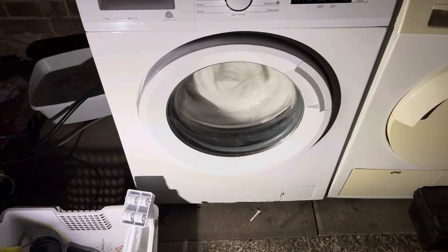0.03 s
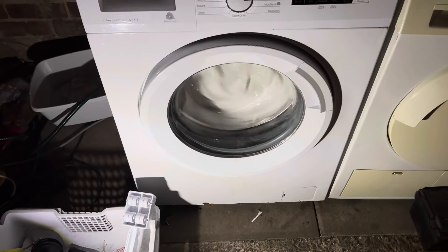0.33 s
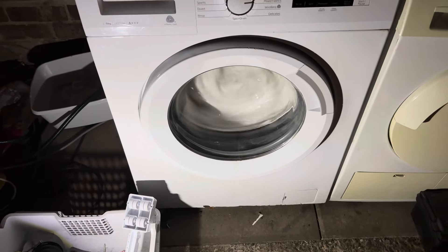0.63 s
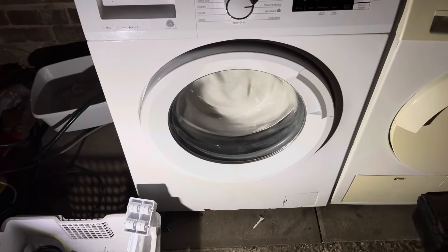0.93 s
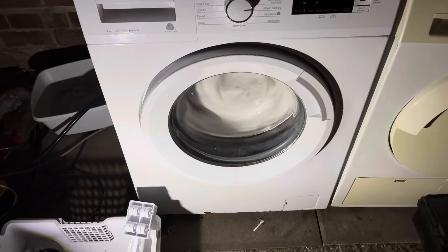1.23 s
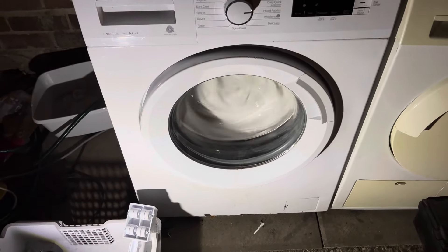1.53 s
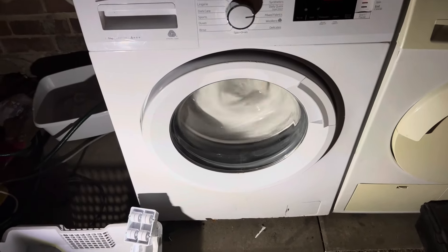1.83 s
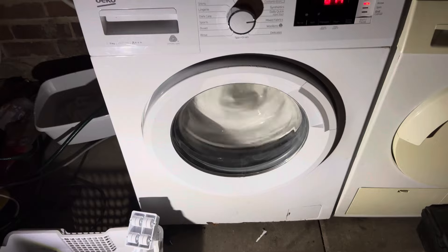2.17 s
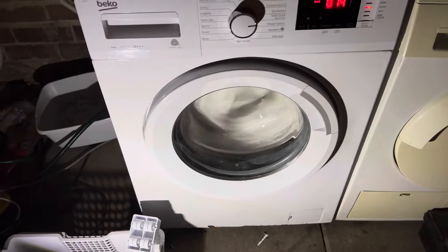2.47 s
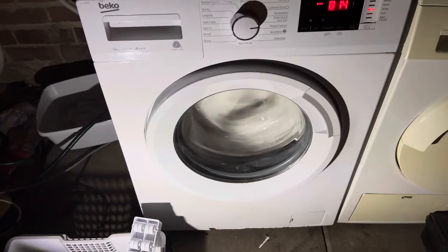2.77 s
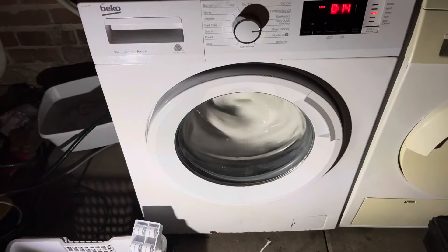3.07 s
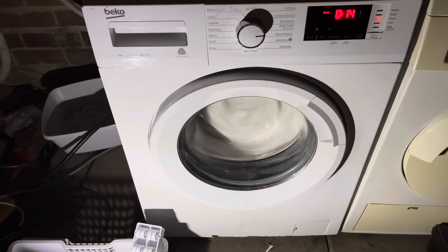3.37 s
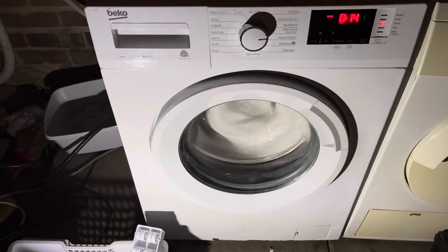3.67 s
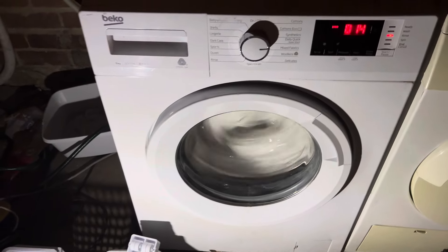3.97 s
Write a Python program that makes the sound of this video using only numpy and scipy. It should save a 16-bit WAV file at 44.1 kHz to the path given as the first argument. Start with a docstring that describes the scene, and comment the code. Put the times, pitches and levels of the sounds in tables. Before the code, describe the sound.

A washing machine spins up, its wet, lopsided load thumping rhythmically over a low rumble.

```python
"""A front-loading washing machine gathers speed for its spin in a small room, about 3.5 turns a second.
On each turn the wet, lopsided load scrubs the door seal by stick-slip friction, then strikes the tub
and excites the cabinet's modes. Beneath this the drum rumbles on its springs and the motor hums.
Water sprays, ticks on the glass and sloshes, air pockets gulp, lumps knock and loose pieces rattle;
later, cloth rustles on the glass and the seal squeaks."""
import sys
import numpy as np
from scipy import signal
from scipy.fft import rfft, irfft
from scipy.io import wavfile
from scipy.ndimage import uniform_filter1d

SR = 44100
rng = np.random.default_rng(int(sys.argv[2]) if len(sys.argv) > 2 else 0)


def wav_out(sig):
    """Save sig, one row per channel (or a flat mono array), as 16-bit PCM at SR to the path in sys.argv[1]."""
    wavfile.write(sys.argv[1], SR, np.round(np.clip(np.atleast_2d(sig).T, -1, 1) * 32767).astype(np.int16))


N = 176400


def from_db(db):
    """Amplitude ratio of a level in decibels."""
    return 10 ** (np.asarray(db) / 20)


def rms_one(x):
    """Normalisation to unit rms."""
    return x / np.sqrt(np.mean(x ** 2) + 1e-20)


def level(rows):
    """Gain over time, interpolated in decibels between (seconds, dB) points."""
    return from_db(np.interp(np.arange(N) / SR, *np.transpose(rows)))


def at_hz(points, hz, column=1):
    """Interpolation of a table column on a logarithmic frequency axis."""
    table = np.array(points)
    return np.interp(np.log(hz), np.log(table[:, 0]), table[:, column])


def swell(start, attack_s, hold_s, release_s):
    """Envelope: exponential growth up to the start, a hold, then exponential decay."""
    t = np.arange(N) / SR - start
    exponent = np.minimum(t, 0) / attack_s - np.maximum(t - hold_s, 0) / release_s
    return np.exp(np.maximum(exponent, -40))


def band(x, low_hz, high_hz):
    """Butterworth band-pass filtering."""
    sos = signal.butter(2, [low_hz, min(high_hz, .45 * SR)], "band", fs=SR, output="sos")
    return signal.sosfilt(sos, x + 1e-18)


def grains(per_s, spread_db):
    """Shot noise: randomly timed impulses of either sign; rms 1."""
    sizes = from_db(spread_db * np.minimum(rng.exponential(1, N), 4)) * rng.choice([-1, 1], N)
    return rms_one(sizes * (rng.random(N) < per_s / SR))


def ring(force, modes):
    """Modal superposition: a force drives damped (Hz, dB, T60) resonators of alternating sign."""
    out = 0
    for k, (hz, db, t60) in enumerate(modes):
        radius, angle = from_db(-60 / (t60 * SR)), 2 * np.pi * hz / SR
        feedback = [1, -2 * radius * np.cos(angle), radius * radius]
        mode = signal.lfilter([0, np.sin(angle)], feedback, force + 1e-18)
        out = out + (-1) ** k * from_db(db) * mode
    return out


def wavering(hz, width_hz):
    """Phase diffusion: a random walk in phase broadens a tone's spectral line; rms 1."""
    wander = np.cumsum(rng.standard_normal(N)) * np.sqrt(2 * np.pi * width_hz / SR)
    return rms_one(np.sin(2 * np.pi * hz * np.arange(N) / SR + wander))


def evened(x, window_s=.06):
    """Division by the running rms steadies a vibration but keeps its fast flutter."""
    power = uniform_filter1d(x ** 2, int(window_s * SR))
    return x / np.sqrt(np.maximum(power, 1e-12))


def panned(db):
    """Left and right gains for a level difference, left minus right."""
    return from_db(np.array([[db], [-db]]) / 2)


# Stereo image, in antiphase near 10 kHz. Each row: frequency in Hz, left-right correlation
# (limited to between -1 and 1 in use), left minus right level in dB.
STEREO_IMAGE = [(60, 0.18, 12), (160, 0.86, 3.5), (326, 0.91, -2.5), (700, 0.54, 1.5), (1280, 0.17, 2.5),
                (2760, 0.47, 5), (5200, 0.6, 1.5), (8150, 0.95, -1), (9440, -1.6, 7), (10730, -1.6, 0),
                (11290, 0.48, -0.5)]


def coloured(source, spectrum):
    """Spectral shaping in stereo: diffuse noise mixed with the source sets the correlation; rms 1."""
    hz = np.maximum(np.arange(N // 2 + 1) * SR / N, 1)
    correlation = np.clip(at_hz(STEREO_IMAGE, hz), -1, 1)
    mid = np.sqrt(1 + correlation) * rfft(source)
    side = np.sqrt(1 - correlation) * rfft(rng.standard_normal(N))
    lean = from_db(at_hz(STEREO_IMAGE, hz, column=2) / 2)
    channels = np.array([(mid + side) * lean, (mid - side) / lean])
    return rms_one(irfft(from_db(at_hz(spectrum, hz)) * channels, N))


def hollow(x, echo_db=-20):
    """Comb filtering: short reflections inside the drum interfere and ripple the spectrum."""
    out = x.copy()
    lags = (rng.uniform(.002, .022, 7) * SR).astype(int)
    for lag, sign in zip(lags, rng.choice([-1, 1], 7)):
        out[lag:] += sign * from_db(echo_db) * x[:-lag]
    return out


def room(x, t60_s=.28):
    """Reverberation: repeated reflection between brick walls, as eight feedback delays a side."""
    out = np.zeros((2, N))
    lags = (rng.uniform(.006, .035, 16) * SR).astype(int)
    for k, lag in enumerate(lags):
        loop, gain = x.copy(), from_db(-60 * lag / SR / t60_s)
        for i in range(lag, N, lag):
            loop[i:i + lag] += gain * loop[i - lag:i][:N - i]
        out[k % 2] += (loop - x) * (-1) ** (k // 2)
    return out / np.sqrt(8)


# Modes of the tub on its springs. Each row: frequency in Hz, relative gain in dB, T60 in seconds.
SUSPENSION_MODES = [(29, -13, 0.22), (40.3, -8.5, 0.14), (61.15, -5.5, 0.42), (70.8, 0, 0.18),
                    (87.5, 1.5, 0.15)]


def rumble():
    """Forced vibration: random shaking drives the resonances of the sprung tub; rms 1."""
    return rms_one(band(ring(rng.standard_normal(N), SUSPENSION_MODES), 15, 104))


# Spectrum of the rolling drum. Each row: frequency in Hz, relative spectral density in dB.
ROLL_SPECTRUM = [(30, -32), (60, -32), (120, 2.5), (200, 0.5), (340, -1.5), (460, -4.5), (800, -8),
                 (1500, -10.5), (2300, -15.5), (3300, -22.5), (5000, -36.5), (15000, -83)]
# Envelopes of the rumble and of the rolling. Each row: time in seconds, level in dB.
RUMBLE_ENVELOPE = [(0, -40.5), (.3, -36.5), (.9, -34), (1.1, -33.5), (2, -30.5), (2.7, -31.5), (3.3, -31),
                   (4, -34)]
ROLL_ENVELOPE = [(0, -39), (.6, -38), (1.2, -36.5), (2.05, -33.5), (2.6, -32), (3.2, -31.5), (4, -31.5)]


def drum():
    """Rolling noise: dense impulses merge into a grainy rush above the rumble of the suspension."""
    roll = coloured(hollow(grains(per_s=4000, spread_db=1.5)), ROLL_SPECTRUM)
    return level(RUMBLE_ENVELOPE) * rumble() + level(ROLL_ENVELOPE) * roll


def motor(hum_hz=198.1, whine_hz=3290):
    """Narrow-band machine noise: a low hum, and a thin whine that grows with the rolling of the drum."""
    growth = rms_one(level(ROLL_ENVELOPE) ** .45)
    hiss = rms_one(ring(rng.standard_normal(N), [(whine_hz, 0, .011)]))
    whine = from_db(-62) * wavering(whine_hz, width_hz=18) + from_db(-60) * hiss
    hum = from_db(-45) * wavering(hum_hz, width_hz=2.54)
    return hum + growth * whine


# Spectrum of the spray. Each row: frequency in Hz, relative spectral density in dB.
SPRAY_SPECTRUM = [(30, -30), (1500, -6.5), (3200, 4.5), (4500, 3.5), (5800, -0.5), (7500, -0.5),
                  (14000, -6)]
# Envelope of the spray. Each row: time in seconds, level in dB.
SPRAY_ENVELOPE = [(0, -52.5), (1.2, -53.5), (1.75, -51.5), (1.95, -51), (2.08, -54), (2.42, -52.5),
                  (2.6, -48.5), (2.9, -48), (3.22, -51.5), (3.5, -48.5), (4, -47.5)]
# Drops striking the glass. Each row: time in seconds, level in dB.
DROP_HITS = [(0.223, -55), (0.266, -50), (1.28, -51), (1.622, -53), (1.81, -54), (1.904, -50), (1.937, -50),
             (2.62, -43.5), (2.838, -47), (2.908, -46), (3.09, -48), (3.686, -50), (3.986, -46)]


def spray(drop_hz=11400):
    """Droplet impact: fine spray on the glass sums to a hiss, while larger drops tick singly."""
    hiss = coloured(rng.standard_normal(N), SPRAY_SPECTRUM)
    hits = sum(from_db(db) * swell(start, .0003, 0, .0038) for start, db in DROP_HITS)
    drops = hits * rms_one(band(rng.standard_normal(N), drop_hz, drop_hz * 1.15))
    return level(SPRAY_ENVELOPE) * hiss + drops + from_db(-8) * room(drops)


# Modes of the tub and cabinet. Each row: frequency in Hz, relative gain in dB, T60 in seconds.
CABINET_MODES = [(61.5, -5.5, 0.32), (79.6, -3, 0.14), (126, -15, 0.098), (149, -12.5, 0.18),
                 (181.3, 1, 0.2), (201.7, -5, 0.25), (255, 5.5, 0.069), (268.6, 0.5, 0.164),
                 (298.3, -0.5, 0.13), (332.6, -1, 0.29), (369.4, -3, .17), (391.2, -1, 0.2),
                 (429, -10, 0.089)]
# Landings of the load's heavy side. Each row: start in seconds, length in seconds,
# relative impact level in dB, relative sway level in dB.
LANDINGS = [(.25, 0.027, -55, -32), (0.504, 0.012, -33, -33), (0.79, 0.061, -30.5, -35),
            (1.074, 0.045, -24.5, -26), (1.314, 0.093, -24.3, -30.5), (1.661, 0.021, -22, -25.5),
            (1.952, 0.02, -22, -24), (2.235, 0.055, -23.5, -30), (2.51, 0.065, -23.5, -24.5),
            (2.766, 0.11, -23, -25), (3.06, 0.021, -20.5, -33), (3.33, 0.076, -24.3, -26.5),
            (3.55, 0.014, -26, -28), (3.79, 0.03, -30.5, -26.5)]


def thumps(contact_hz=388, blow_db=-15, jolt_db=-3):
    """Rotating unbalance: a soft blow and a flurry of jolts ring the cabinet as the sprung tub sways."""
    blows, weight, sway = np.zeros(N), 0, 0
    for start, length, db, sway_db in LANDINGS:
        blows[int(start * SR)] = from_db(db + blow_db)
        weight += from_db(db) * swell(start, .017, length, .054)
        sway += from_db(sway_db) * swell(start, .017, length, .045)
    soft_contact = signal.butter(1, contact_hz, fs=SR)
    jolts = signal.lfilter(*soft_contact, grains(per_s=900, spread_db=3.5))
    shaking = from_db(jolt_db) * weight * evened(ring(jolts, CABINET_MODES))
    body = ring(signal.lfilter(*soft_contact, blows), CABINET_MODES) + shaking
    return body + from_db(-8.5) * room(band(body, 76, 2000)) + from_db(-5.5) * sway * rumble()


# Modes of a loose piece. Each row: multiple of its pitch, relative gain in dB, T60 in seconds.
PIECE_MODES = [(.78, -13, .04), (1, 0, .017), (1.32, -17, .02)]
# Clacks in the drum. Each row: start in seconds, scuff level in dB, ping level in dB, pitch in Hz.
CLACKS = [(0.304, -45, -45, 4380), (1.825, -39, -38, 4130), (1.938, -50, -39.5, 6250),
          (1.950, -43, -28, 3700), (2.846, -46, -44, 7400), (2.921, -52, -41, 7200),
          (3.048, -40, -39, 2770), (3.706, -43, -36, 3080), (3.917, -48, -44, 3300)]


def rattles(scuff_decay_s=.0071):
    """Hard impact: small pieces hit the steel drum with a scuff of noise and a ping of free vibration."""
    out, size = np.zeros(N + SR), SR // 10
    decay = np.exp(-np.arange(size) / SR / scuff_decay_s)
    for start, scuff_db, ping_db, hz in CLACKS:
        scuff = decay * rms_one(band(rng.standard_normal(size), hz / 1.5, hz * 1.2))
        modes = [(hz * ratio, db, t60) for ratio, db, t60 in PIECE_MODES]
        ping = ring(signal.unit_impulse(size), modes)
        onset = int(start * SR)
        out[onset:onset + size] += from_db(scuff_db) * scuff + from_db(ping_db) * ping
    return out[:N] + from_db(-5) * room(out[:N])


# Modes of the door and front panel. Each row: frequency in Hz, relative gain in dB, T60 in seconds.
DOOR_MODES = [(343.8, 3, 0.2), (395, -9, 0.21), (513.3, -5.5, 0.12), (590, -5.5, 0.11), (936, -2, 0.095),
              (981, 2.5, 0.053), (1036, 3, 0.051), (1127, 1, 0.048), (1506, -9, 0.055)]
# Spectrum of the friction. Each row: frequency in Hz, relative spectral density in dB.
SCRUB_SPECTRUM = [(30, -45), (120, 8), (340, 7.5), (480, 2.5), (750, 4), (1050, -3), (1400, -3), (2000, -5),
                  (3000, -18), (5000, -23.5), (7500, -25.5), (15000, -44)]
# Passes of the load over the seal, one a turn. Each row: start in seconds, length in seconds,
# rush level in dB, door ring level in dB.
SEAL_PASSES = [(0.377, 0.15, -40, -53), (0.698, 0.1, -37.5, -47.5), (1.001, 0.13, -35.5, -39),
               (1.298, 0.11, -34.5, -38.5), (1.585, 0.14, -35, -38), (1.863, 0.12, -31.5, -35.5),
               (2.151, 0.11, -31.7, -32.5), (2.466, 0.094, -32, -31.5), (2.717, 0.098, -32.5, -31.5),
               (3.034, 0.054, -31.5, -36), (3.255, 0.083, -37, -38.5), (3.534, 0.02, -39.5, -42),
               (3.906, 0.04, -36, -49)]


def scrub(rise_db_per_s=9):
    """Stick-slip friction: the load drags over the seal under rising pressure and rings the door."""
    rush_gain, door_gain = 0, 0
    for start, length, rush_db, door_db in SEAL_PASSES:
        from_middle_s = np.clip(np.arange(N) / SR - start, 0, length) - length / 2
        pressure = swell(start, .02, length, .038) * from_db(rise_db_per_s * from_middle_s)
        rush_gain += from_db(rush_db) * pressure
        door_gain += from_db(door_db) * pressure
    slips = hollow(grains(per_s=1500, spread_db=2))
    door = door_gain * rms_one(ring(slips, DOOR_MODES))
    rush = rush_gain * coloured(slips, SCRUB_SPECTRUM)
    return rush + door * panned(6.5) + from_db(-5) * room(door)


# Lumps of laundry hitting the drum wall. Each row: start in seconds, level in dB, pitch in Hz.
LUMP_HITS = [(0.508, -25, 268), (0.816, -24, 191), (0.999, -26.5, 320), (1.044, -24.5, 385),
             (1.069, -23, 194), (1.118, -25, 200), (1.314, -24, 331), (1.36, -23.5, 348), (1.572, -24, 167),
             (1.668, -24, 167), (1.912, -23, 318), (2.141, -23, 191), (2.234, -22, 330), (2.28, -21, 400),
             (2.508, -18.5, 186), (3.335, -19.5, 218), (3.549, -20, 261)]


def knocks(note_t60_s=.066, slap_decay_s=.006, slap_db=-12.5):
    """Damped impact: each lump lands with a wet slap and excites one dull, short-lived mode."""
    out, size = np.zeros(N + SR), SR // 5
    decay = np.exp(-np.arange(size) / SR / slap_decay_s)
    for start, db, hz in LUMP_HITS:
        slap = decay * rms_one(band(rng.standard_normal(size), 280, 1140))
        note = ring(signal.unit_impulse(size), [(hz, 0, note_t60_s)])
        onset = int(start * SR)
        out[onset:onset + size] += from_db(db) * (note + from_db(slap_db) * slap)
    return out[:N] + from_db(-12) * room(out[:N])


# Water thrown by the load. Each row: start in seconds, length in seconds, level in dB, centre in Hz.
WATER_SLAPS = [(0.686, 0.04, -44, 1230), (1.003, 0.019, -44, 1400), (1.39, .035, -43, 1530),
               (1.666, .015, -45, 1930), (3.047, 0.013, -42, 1500), (3.545, 0.0086, -41, 814),
               (3.704, 0.028, -47, 2600), (3.915, 0.028, -44.5, 2400)]


def sloshes(band_ratio=1.25):
    """Bubble noise: water slaps the door, and many brief pulses in one band merge into a gurgle."""
    out = np.zeros(N)
    for start, length, db, hz in WATER_SLAPS:
        bubbles = rms_one(band(grains(per_s=1000, spread_db=0), hz / band_ratio, hz * band_ratio))
        out += from_db(db) * swell(start, .006, length, .018) * bubbles
    return out * panned(3.9) + from_db(-10.5) * room(out)


# Air pockets in the load. Each row: start in seconds, length in seconds, level in dB, pitch in Hz.
AIR_POCKETS = [(0.702, .02, -45, 1290), (1.365, .02, -38, 950), (1.655, .015, -38.5, 930),
               (2.231, 0.016, -34, 990), (2.515, .012, -34.5, 980), (2.545, 0.016, -36.5, 1030),
               (2.712, .02, -36, 1025), (2.751, 0.063, -35.5, 1125), (3.055, .025, -36, 1040)]


def gulps():
    """Cavity resonance: air pockets squeezed from the wet load ring briefly, each at its own pitch."""
    out = sum(from_db(db) * swell(start, .0036, length, .012) * wavering(hz, width_hz=45)
              for start, length, db, hz in AIR_POCKETS)
    return out * panned(5.4) + from_db(-8) * room(out)


# Wet cloth scraping the glass. Each row: start in seconds, length in seconds, level in dB.
CLOTH_SCRAPES = [(1.824, .022, -51), (1.945, .03, -49), (3.705, 0.028, -45.5), (3.757, .025, -55),
                 (3.91, 0.028, -48.5)]


def rustles():
    """Irregular stick-slip: cloth catches and releases the glass in quick, gritty runs."""
    pressure = sum(from_db(db) * swell(start, .0022, length, .02) for start, length, db in CLOTH_SCRAPES)
    catches = hollow(grains(per_s=500, spread_db=2))
    out = pressure * rms_one(band(catches, 2800, 4400))
    return out + from_db(-5) * room(out)


# Squeaks of the seal. Each row: start in seconds, length in seconds, level in dB, pitch in Hz.
SEAL_SQUEAKS = [(3.654, .006, -47.5, 4000), (3.887, .006, -44.5, 3570), (3.909, 0.0044, -46, 3850)]


def squeaks():
    """Nearly periodic stick-slip: the wet rubber seal catches on the glass in tiny, high tones."""
    out = sum(from_db(db) * swell(start, .0015, length, .004) * wavering(hz, width_hz=59)
              for start, length, db, hz in SEAL_SQUEAKS)
    return out + from_db(-5) * room(out)


def scene():
    """Superposition: all the sources add, as heard in front of the machine."""
    load = scrub() + thumps() + knocks() + rustles() + squeaks() + rattles()
    return load + drum() + motor() + spray() + sloshes() + gulps()


def record(dry, low_hz=22, high_hz=14600):
    """Band limiting: a gentle high-pass thins the deepest bass and a steep low-pass cuts the top."""
    thinned = signal.sosfilt(signal.butter(2, low_hz, "high", fs=SR, output="sos"), dry)
    return signal.sosfilt(signal.ellip(10, .3, 80, high_hz, fs=SR, output="sos"), thinned)


dry = scene()
out = record(dry)
wav_out(out)
```